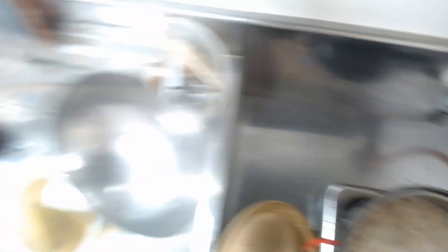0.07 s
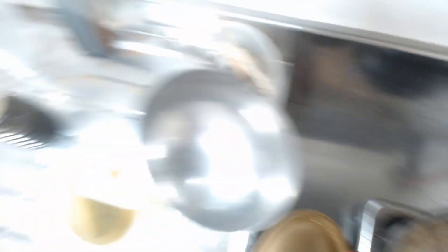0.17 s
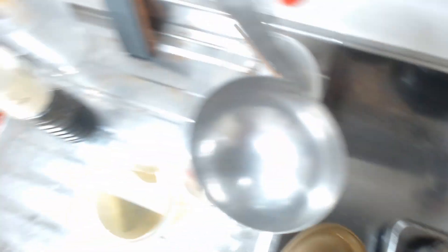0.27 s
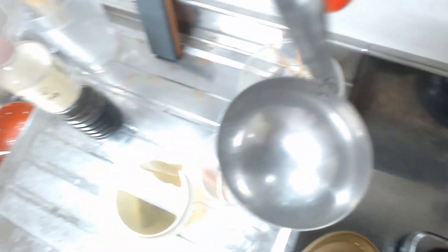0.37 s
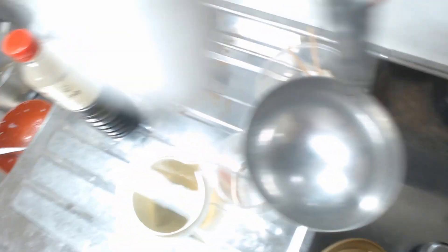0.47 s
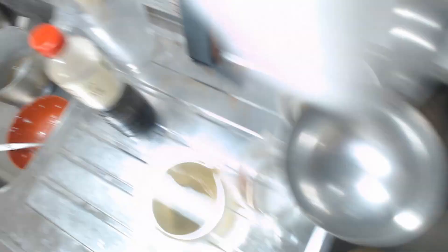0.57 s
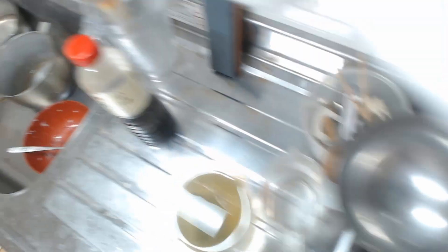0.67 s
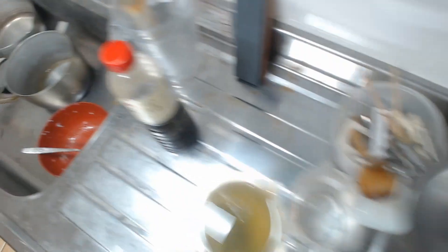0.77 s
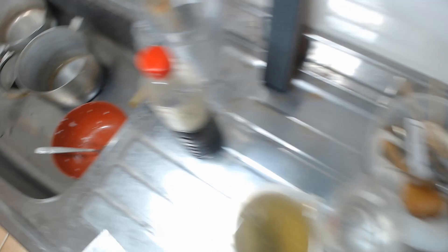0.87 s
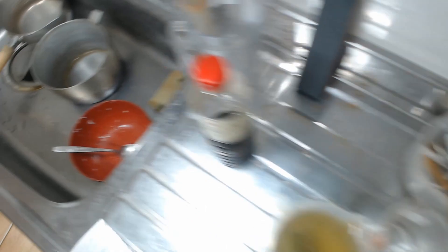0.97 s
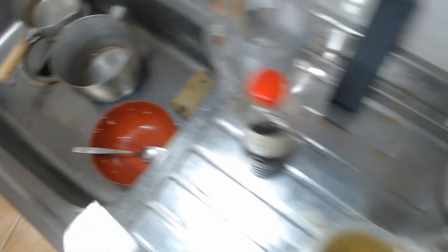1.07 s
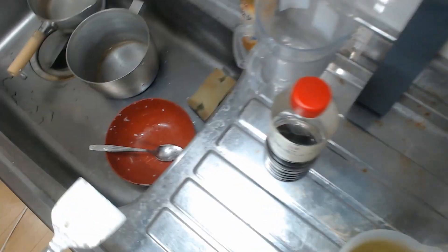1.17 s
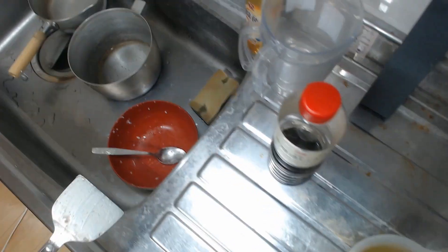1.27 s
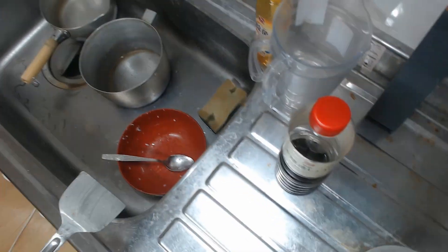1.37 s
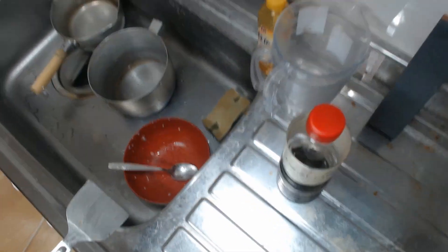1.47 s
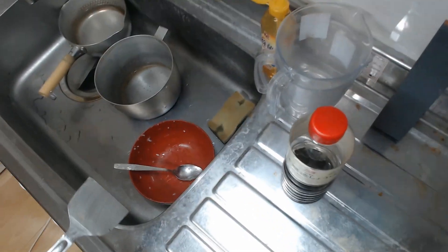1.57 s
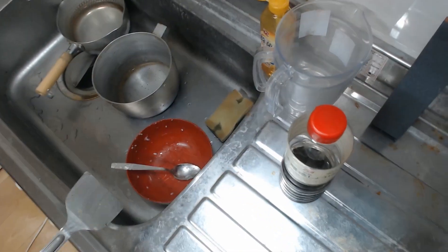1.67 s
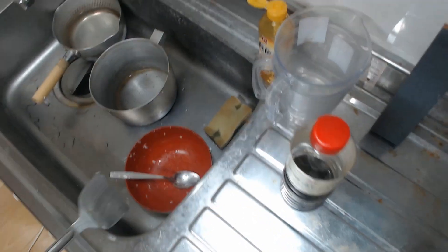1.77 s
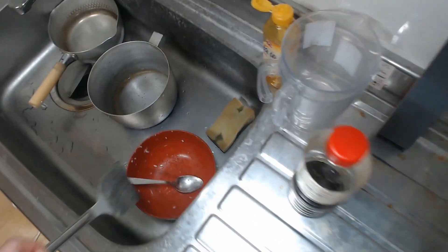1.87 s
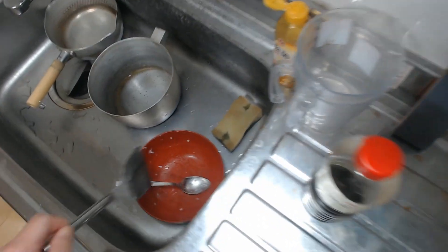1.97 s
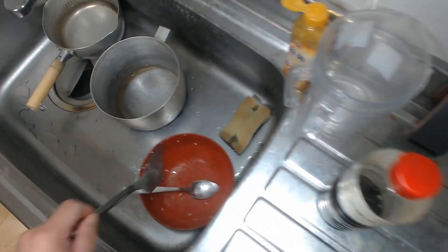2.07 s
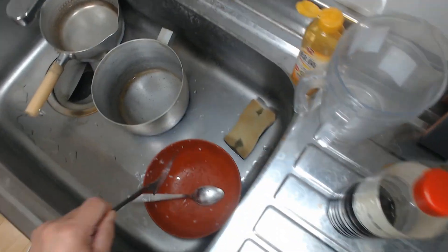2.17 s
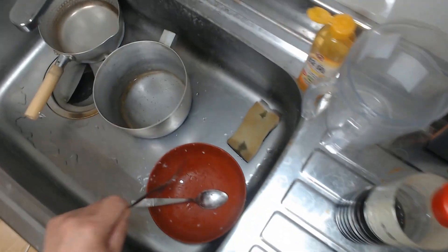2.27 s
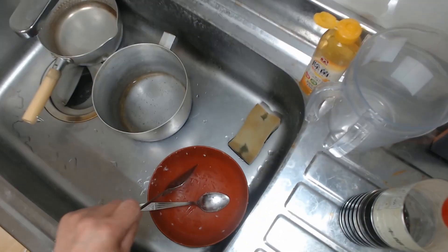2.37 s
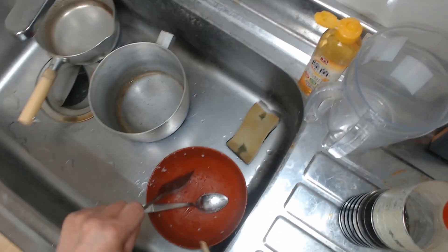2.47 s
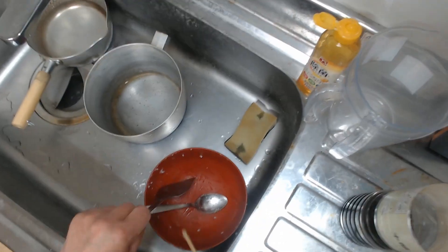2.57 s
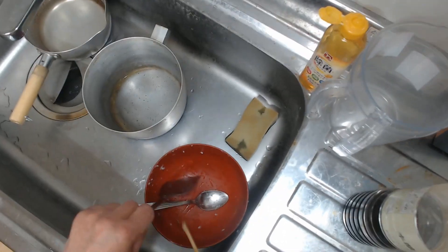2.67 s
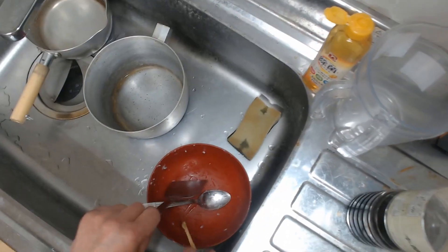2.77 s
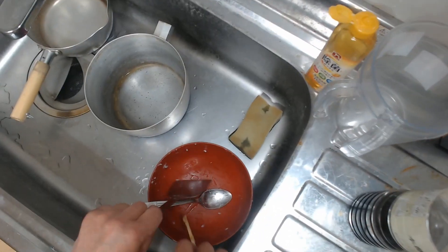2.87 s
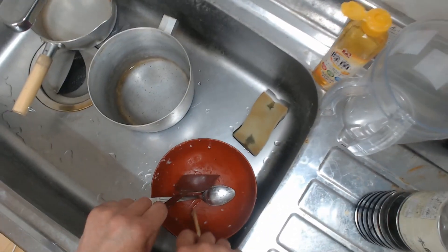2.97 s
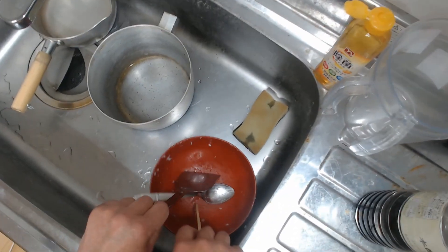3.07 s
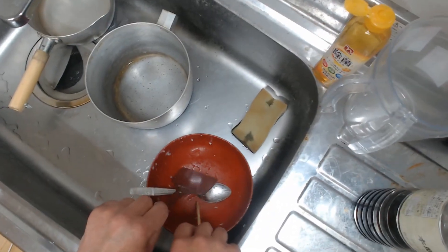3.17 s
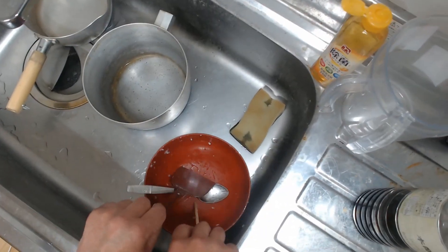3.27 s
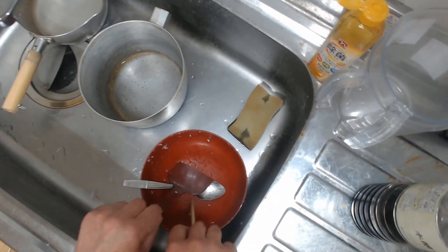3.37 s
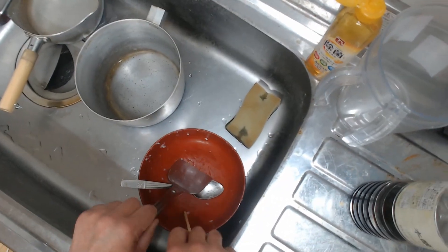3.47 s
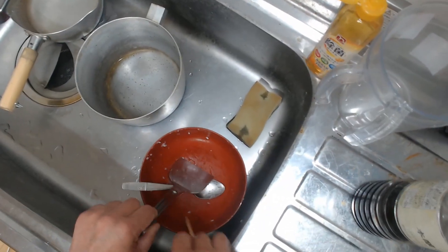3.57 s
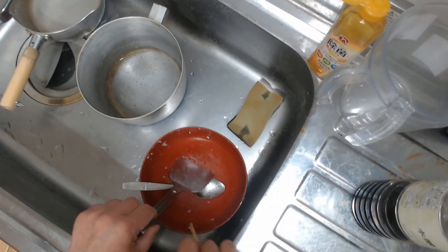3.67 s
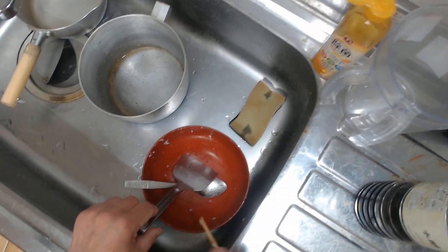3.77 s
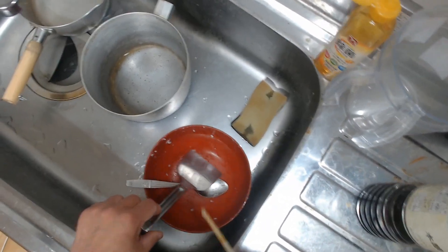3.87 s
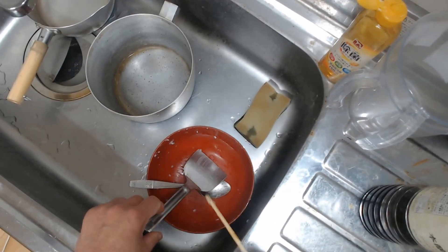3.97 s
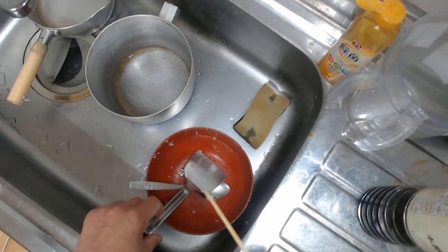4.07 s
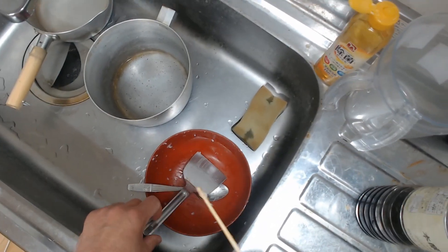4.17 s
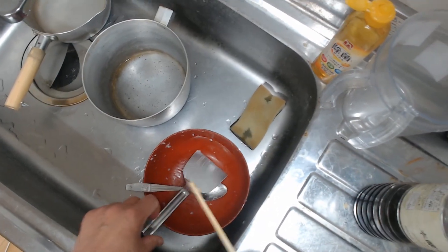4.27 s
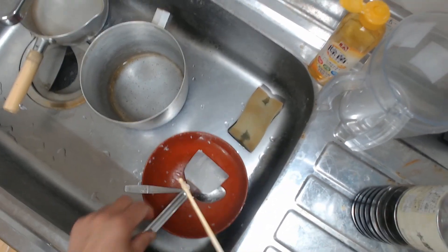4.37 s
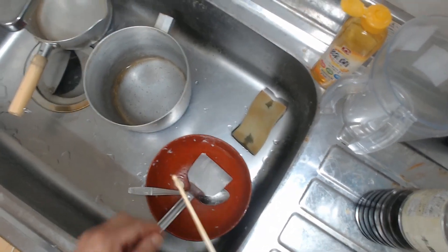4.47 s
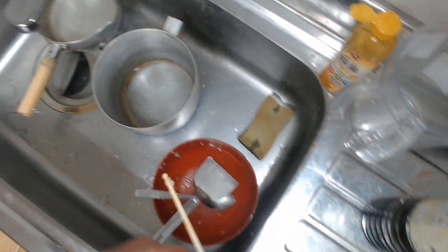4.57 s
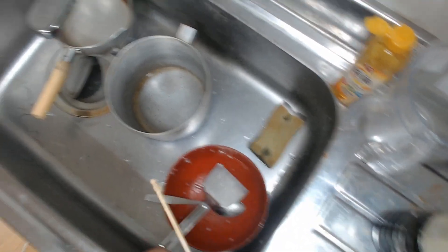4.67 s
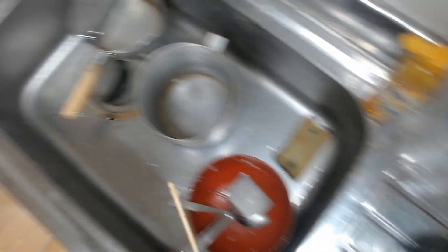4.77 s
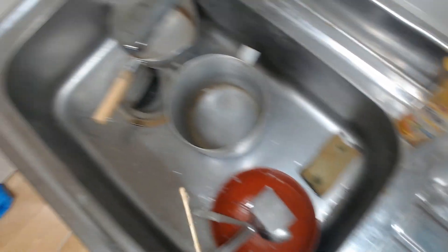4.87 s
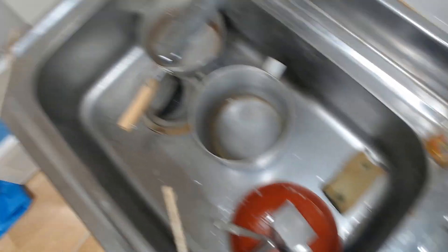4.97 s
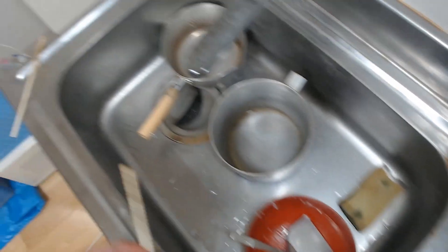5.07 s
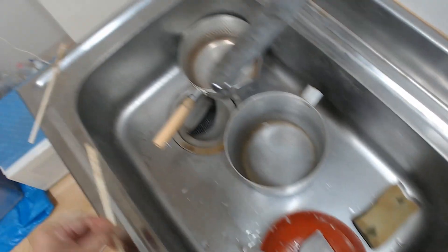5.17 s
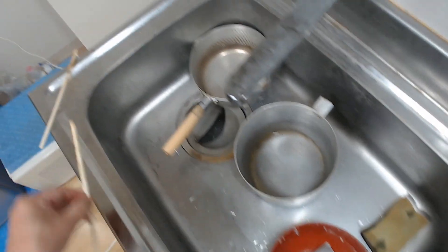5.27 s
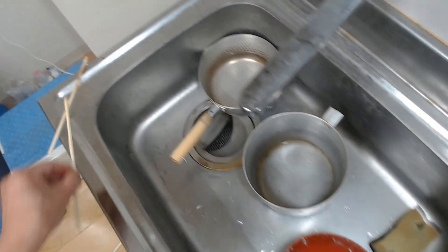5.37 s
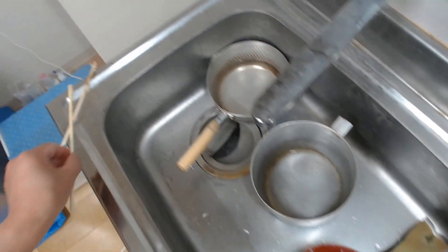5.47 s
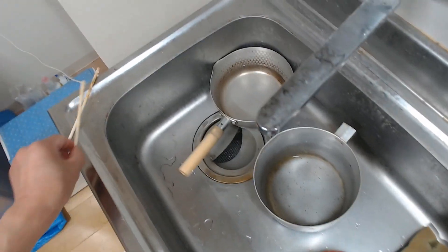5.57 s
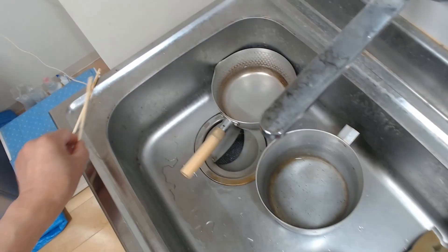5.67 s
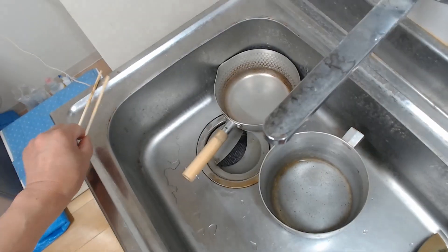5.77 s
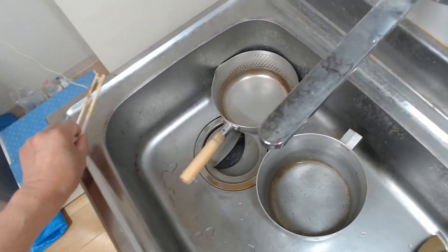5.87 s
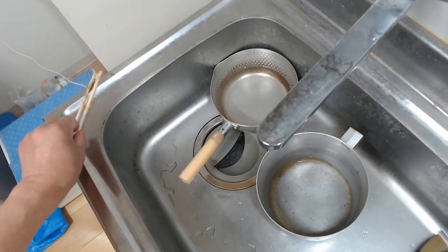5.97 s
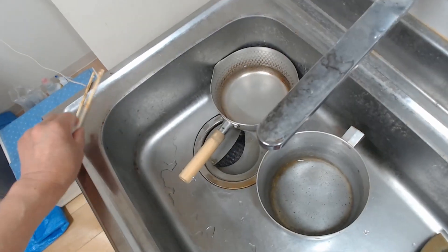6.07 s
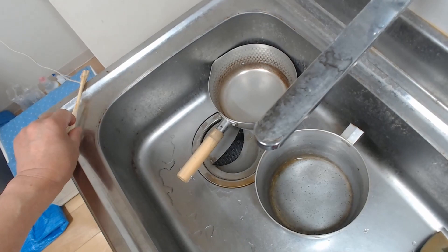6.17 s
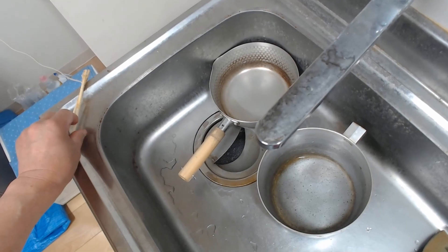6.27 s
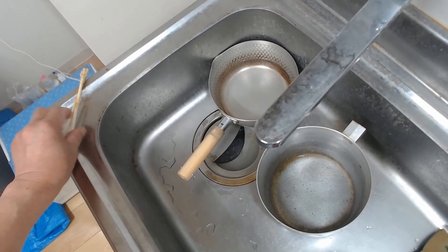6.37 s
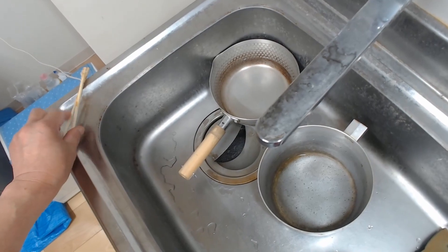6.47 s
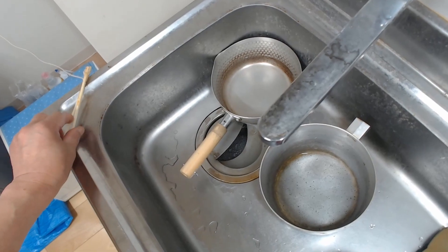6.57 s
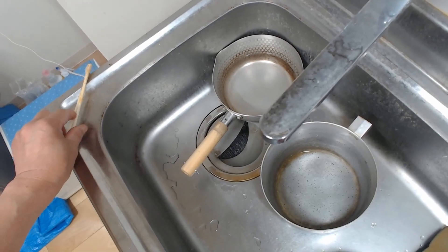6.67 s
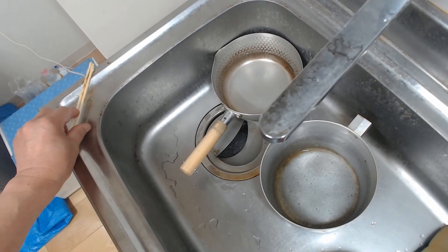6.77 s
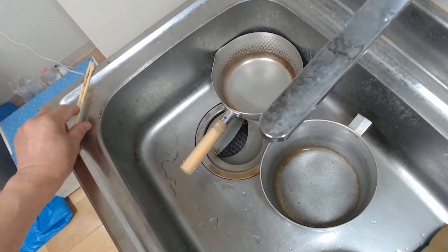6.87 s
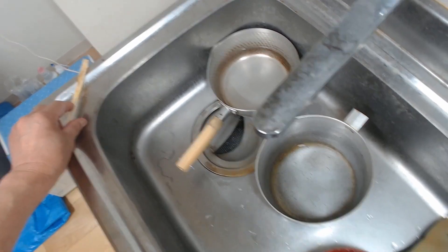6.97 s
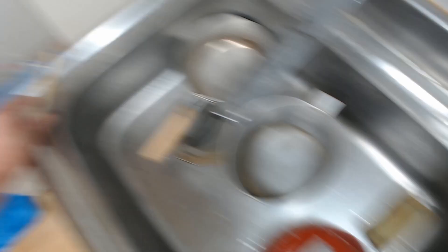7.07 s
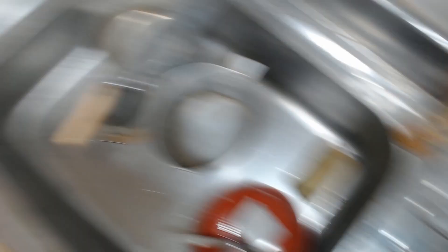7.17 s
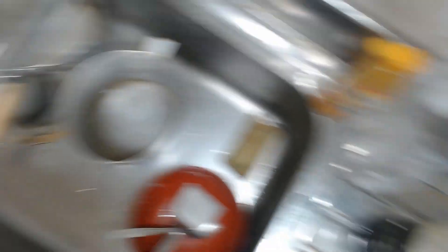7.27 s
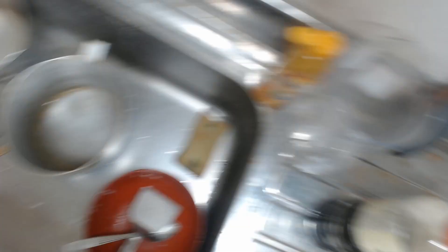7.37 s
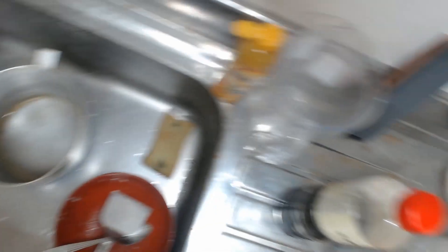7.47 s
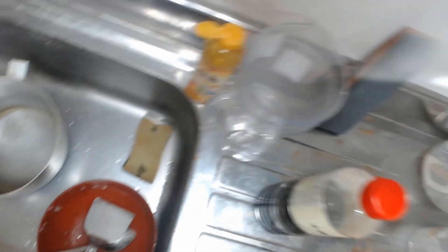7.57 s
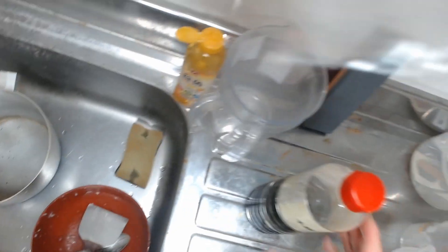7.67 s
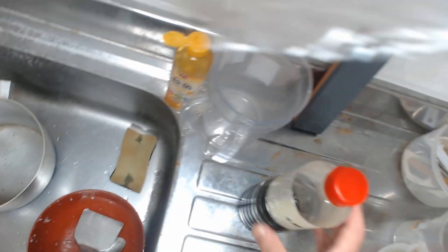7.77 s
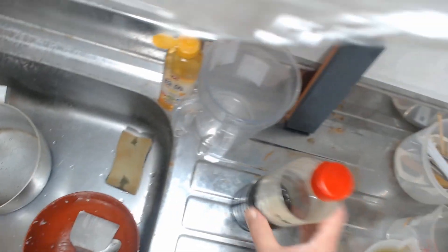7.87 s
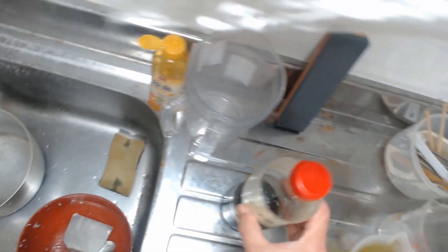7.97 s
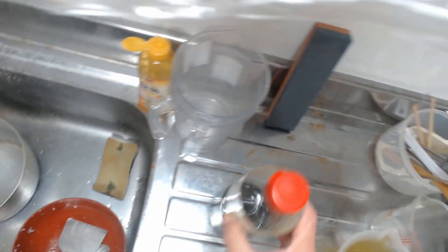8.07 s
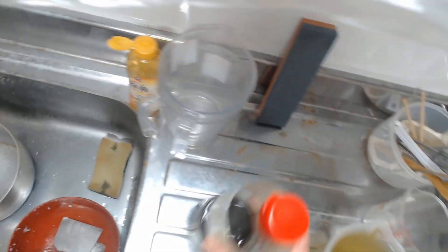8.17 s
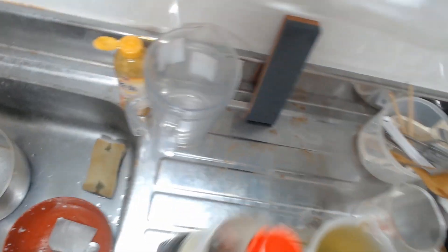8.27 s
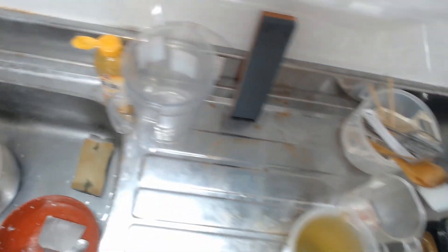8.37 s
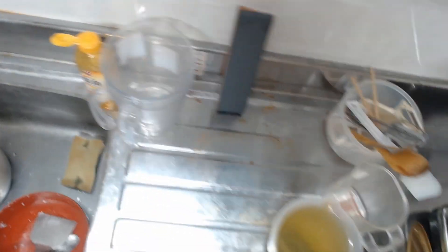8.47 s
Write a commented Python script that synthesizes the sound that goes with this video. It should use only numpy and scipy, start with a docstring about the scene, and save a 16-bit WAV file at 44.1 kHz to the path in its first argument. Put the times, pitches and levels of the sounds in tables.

```python
"""Clearing up at a steel sink

A spatula is knocked on a bowl and the sink's wall, scraped clean and dropped; chopsticks tap and slide on the rim.
A bottle groans over the drainboard, things clink there, and soft steps and rustles pass over air and a faint hum.
Shaped pushes and uneven friction excite bodies built from decaying modes and dense noise washes;
the squeal and the groan are unsteady sine tones."""
import sys
import numpy as np
from scipy import signal
from scipy.fft import rfft, irfft
from scipy.io import wavfile

SR = 44100
rng = np.random.default_rng(int(sys.argv[2]) if len(sys.argv) > 2 else 0)


def file_out(sig):
    """Save sig as 16-bit WAV at sys.argv[1]."""
    # one column per channel
    cols = np.atleast_2d(sig).T
    # limit, then scale
    lim = np.clip(cols, -1, 1)
    pcm = np.round(lim * 32767).astype(np.int16)
    wavfile.write(sys.argv[1], SR, pcm)


N = 376613
TIME = np.arange(N) / SR

# All levels are relative unless called rms.
# Room air: f/Hz, density/dB per Hz
AIR_COLOUR = [(15, -43), (25, -7.5), (64, 1), (86, -18), (189, -14), (235, -21), (261, -23), (382, -15),
              (461, -27.5), (572, -18), (620, -30.5), (710, -24.5), (3490, -40), (5820, -38),
              (15800, -61.5)]
# Appliance hum, before panning: f/Hz, rms level/dB
HUM_TONES = [(59.4, -67.5), (1120, -84.5), (4107, -92), (5798, -94), (6202, -93.5)]
AIR_RMS_DB = -59.5  # before panning
TOP_HZ = 15800
# Likeness of the two channels: f/Hz, correlation
LIKENESS = [(30, .9), (150, .995), (400, .99), (700, .75), (1400, .4), (2800, .62), (5000, 0), (12000, .2)]
# Ring time of sink and kitchen together, before each body's scale: f/Hz, t60/s
ROOM_RING = [(100, 0.22), (400, 0.44), (1000, 0.13), (3000, 0.28), (8000, .26), (15000, 0.38)]

# Soft contacts of feet, sleeve and hand: t/s, length/s, level/dB, thud/dB, clink/dB, tick/dB
BRUSHES = [(0.27, 0.087, -41.5, 6, -9, -6), (0.84, 0.19, -52, 5.5, -6.5, -2.5),
           (1.11, 0.2, -56, -14, 4, 11), (1.465, 0.077, -46, 3.5, -7, -3.5), (1.68, 0.1, -55, 9, 1.5, 0),
           (1.745, 0.03, -55, 26, 1, -22), (2.11, 0.088, -57.5, -1, -3, 3), (8.28, 0.24, -54.5, 15, 2, 6),
           (8.33, 0.053, -53.5, 24.5, -22, 1), (8.44, 0.092, -47, 16.5, -2, -1.5)]
# Weak resonances answering the brushes: f/Hz, density/dB per Hz
COUNTER_WASH = [(30, -11), (90, -11), (170, 4.5), (280, -1.5), (450, -1), (700, -3), (1100, -8),
                (1700, -11.5), (2800, -13), (3900, -15), (4800, -17), (7000, -23.5), (9000, -37.5),
                (15500, -39)]

# Light clinks on the drainboard: t/s, level/dB, thud/dB, treble/dB, left minus right from 1 kHz up/dB
CLINKS = [(0.221, -51.5, 14, -1, 10.5), (5.369, -74, 1, -5, -8), (5.79, -73, 0, -10, 4),
          (7.662, -69.5, 4, -9, -6), (7.685, -54.5, -9, -10, -3.5), (8.139, -72, 8, 1, -3)]
# Things shifting against each other: t/s, length/s, level/dB, thud/dB, clink/dB, tick/dB
JOSTLES = [(-0.01, 0.08, -51, 4, -1.5, 1), (0.11, 0.12, -55, 0, 0, -2), (0.21, 0.041, -44, 6, -8, -5)]
# Things on the drainboard, modes: f/Hz, level/dB, t60/s
DISH_MODES = [(910, 3, 0.3), (943, -2, 0.25), (1604, -5, 0.12), (1876, 3.5, 0.29), (2760, -7, 0.14),
              (3020, -11, 0.37), (3530, 6.5, 0.11), (4920, -22, 0.11), (6000, 1, 0.1), (7380, 4, 0.12)]
# Their weaker resonances: f/Hz, density/dB per Hz
DISH_WASH = [(300, -7), (600, 4), (1100, 1.5), (7000, -8.5), (9000, -22), (15500, -24)]
CLINK_TICK_DB = -5  # tick of a clink, relative to its treble

# Drainboard modes: f/Hz, level/dB, t60/s
BOARD_MODES = [(175.3, 8.5, 0.27), (341.8, 4, 0.39), (374, 2, 0.19), (613, -23, .2), (1105, -6, 0.21)]
# Weaker resonances of the drainboard: f/Hz, density/dB per Hz
BOARD_WASH = [(25, 6), (45, 9), (90, -6), (180, 10.5), (270, -13), (380, 2), (570, -6), (760, -14),
              (1150, -22.5), (1800, -29.5), (3000, -46), (6000, -48), (15500, -56)]
# One pull of the bottle: it breaks loose, slides ever more lightly and stops
DRAG_S, DRAG_LENGTH_S, DRAG_DB = 7.755, 0.24, -36
DRAG_ATTACK_S, DRAG_RELEASE_S, DRAG_SAG_DB_PER_S = 0.055, 0.047, 28.5
TYPICAL_SLIPS_PER_S = 60
GROAN_START_HZ, GROAN_HZ, GROAN_RISE_S = 390, 543, 0.062
GRATE_DB, GRATE_LENGTH_S, GRATE_RELEASE_S = -54.5, 0.059, .04  # grit under the base as it breaks loose

# Chopsticks tapping at the rim: t/s, level/dB, thud/dB, clink/dB, tick/dB
RIM_TAPS = [(3.083, -39.5, 5.5, -13, -2.5), (6.024, -36, -2, 7.5, 7.5), (6.032, -28, 2, 7, 4.5),
            (6.205, -39.5, 6.5, -20, -6), (6.224, -41.5, 11, -20, -4), (6.377, -48.5, 16, -2.5, 9),
            (6.398, -51, 6, -25, -2), (6.533, -59, -8, -2, -5), (6.620, -51, 8, -17, -7)]
# Chopsticks sliding along the rim: t/s, length/s, level/dB, thud/dB, clink/dB, tick/dB
RIM_SLIDES = [(5.98, 0.086, -50, 21, -24, -18), (6.20, 0.064, -39.5, 7, -36, -8),
              (6.37, 0.061, -48.5, 16.5, -10, 8), (6.58, 0.076, -42.5, 0, -16, -5),
              (6.73, 0.062, -55, -13, -9, -10)]
# Rim modes: f/Hz, level/dB, t60/s
RIM_MODES = [(193.7, -12, 0.47), (338, -3, 0.55), (380, 2.5, 0.32), (542.3, 3, 0.27), (726, 2.5, 0.2),
             (887, 1, 0.34), (943.4, 6, 0.17), (1093, 6.5, 0.12), (1480, -25, .2), (1808, -9, 0.26),
             (2440, -23.5, .17), (2772, -32, .2), (3400, -27, 0.52), (3520, -4, 0.15)]
# Weaker resonances of the rim: f/Hz, density/dB per Hz
RIM_WASH = [(50, -48), (130, -4), (230, -11.5), (400, 2.5), (650, 8), (1100, 4.5), (1500, -3.5),
            (2500, -12.5), (3800, -7.5), (4800, -20.5), (7000, -25.5), (9000, -33.5), (15500, -38)]

# Spatula knocking on the sink's wall: t/s, level/dB, thud/dB, clink/dB, tick/dB
WALL_KNOCKS = [(2.373, -29, -3, -2.5, -2), (2.380, -30.5, 6.5, 1.5, 9), (2.392, -28.5, -5.5, -0.5, -1.5),
               (2.426, -34, 6.5, -14, -16)]
# Wall modes: f/Hz, level/dB, t60/s
WALL_MODES = [(110.3, -14, 0.5), (182.6, 3.5, 0.26), (209, -2, 0.65), (389.6, 2.5, 0.41), (567, -6.5, 0.35),
              (727, -15, 0.49), (757, -6, 0.19), (947, -1.5, 0.25), (1104, -3.5, 0.17), (1300, -16, 0.35),
              (1616, -13, 0.29), (1831, -10, 0.19), (2019, -6, 0.16), (2206, -11, 0.22),
              (2405, -24.5, 0.45), (2770, -12, 0.42), (3800, -9, 0.17), (4040, -4, 0.073)]
# Weaker resonances of the wall: f/Hz, density/dB per Hz
WALL_WASH = [(30, -14), (85, -25), (170, 8.5), (270, -3.5), (400, 4.5), (750, 0), (1200, -3), (1700, -7),
             (2800, -4.5), (3900, -14), (4800, -22.5), (7000, -28.5), (9000, -34), (15500, -40.5)]

# Strokes across the bowl: t/s, length/s, scrape level/dB, basin shudder level/dB, favoured f/Hz
STROKES = [(2.881, .18, -51, -51, 2330), (3.102, 0.045, -55, -33.5, 2700), (3.206, 0.059, -56, -42.5, 4200),
           (3.275, 0.051, -53, -41, 3700), (3.324, 0.031, -52, -42, 3700), (3.38, 0.084, -53, -54, 3740),
           (3.543, 0.094, -49.5, -47.5, 3530), (3.64, 0.048, -43.5, -44, 2980),
           (3.691, 0.051, -44.5, -39, 3640)]
# Spatula gripped and pressed on the bowl, modes: f/Hz, level/dB, t60/s
PRESSED_MODES = [(562, 6, 0.22), (1085, 6, 0.17), (2440, 5.5, 0.13), (2610, -10, .1), (2790, 3.5, 0.32),
                 (3300, -2, 0.13), (3476, -20, 0.12), (3680, 0.5, 0.074), (3930, -1, 0.19)]
# Dense resonances under the scrape: f/Hz, density/dB per Hz
SCRAPE_WASH = [(200, -8.5), (400, -6), (750, 10), (1100, -3), (1600, 0), (2100, 2), (2400, 5), (3800, -2.5),
               (4500, -1.5), (5600, -4), (8000, -14), (15500, -26)]
STROKE_ATTACK_S, STROKE_RELEASE_S, STROKE_SAG_DB_PER_S = 0.0097, 0.021, 10
FOCUS_DB, FOCUS_OCTAVES = 8.5, 0.34  # lift and width of the resonances that a stroke favours
# The blade's edge squeals once, falling in pitch as it slows
SQUEAL_S, SQUEAL_LENGTH_S = 3.31, .18
SQUEAL_HZ, SQUEAL_SAG_HZ_PER_S = 5810, 1600
SQUEAL_DB, SQUEAL_FADE_DB_PER_S = -62, 79

# Light knocks of utensils on the bowl: t/s, level/dB, thud/dB, clink/dB, tick/dB
BOWL_KNOCKS = [(1.492, -54.5, 3.5, -2.5, -4), (2.622, -53, 11, -10, -17), (2.803, -46, 4, -13, -13),
               (2.879, -53.5, 7, -1, -16), (3.132, -41.5, 1.5, -3, -7), (3.203, -47, 6, 7, 12),
               (3.653, -55.5, 2, 18.5, 13.5), (3.846, -45.5, 3.5, -4.5, -8)]
# Dropped spatula lands on its blade, then its handle, and rattles: t/s, level/dB, thud/dB, clink/dB
DROP_BOUNCES = [(4.178, -20, -4, 1), (4.186, -16.5, -9.5, 5), (4.190, -21.5, 1, -1.5), (4.1958, -22, 8, -2),
                (4.2127, -19.5, 2.5, 0), (4.224, -25.5, 1, -0.5), (4.234, -26, 1.5, 5.5)]
DROP_TICK_DB, DROP_PAN_DB = 0, -0.7
# Tiny bright ticks: t/s, level/dB
TICKS = [(5.279, -75.5), (8.383, -70)]
# Colour of those ticks: thud/dB, boom/dB, clink/dB, tick/dB
TICK_COLOUR = (-3, -17, -15, 21.5)
# Steel basin with the bowl standing in it, modes: f/Hz, level/dB, t60/s
BASIN_MODES = [(146.3, -2, 0.53), (173.4, -6.5, .3), (211.3, -8, .4), (335, -7.5, 0.36), (385.4, 2.5, .47),
               (588, -3, .3), (702, -12, 0.3), (774, -7.5, 0.22), (818, -12.5, .21), (898.2, -13, 0.26),
               (958, -4.5, 0.24), (1070, -12.5, .24), (1120, -6, .22), (1506, -8.5, .22),
               (1807, -11.5, .18), (1900, -14, 0.23)]
# Steel spatula modes: f/Hz, level/dB
SPATULA_MODES = [(2266, -10), (2373, -7.5), (2402, -1.5), (2566, -4), (2745, -7.5), (2782, -1.5),
                 (3149, -19), (3345, -7.5), (3528, -1), (3690, -9.5), (3860, -14.5), (4060, -15.5),
                 (4761, -15.5), (6060, -22.5)]
SPATULA_T60_S = .2
# Weaker resonances and wall echoes of the sink: f/Hz, density/dB per Hz
SINK_WASH = [(30, -13), (85, -13.5), (140, -0.5), (270, -16), (385, 7), (490, -6.5), (700, -2.5),
             (1150, -6), (1700, -9), (2100, -7.5), (2800, -4.5), (3900, -12.5), (4800, -15), (7000, -21),
             (9000, -31.5), (11000, -30.5), (15500, -39.5)]

BOOM_PER_THUD = 0.49  # a heavier contact booms more: dB of boom per dB of thud
# How each place answers a contact: (boom/dB, left minus right from 1 kHz up/dB)
BOWL_PLACE, WALL_PLACE, RIM_PLACE = (-0.14, -1.8), (-2.5, -2), (-7.5, -4.5)
SLIDE_PLACE, DISH_PLACE, COUNTER_PLACE = (-3, -1.6), (2.5, 8.2), (-5.5, -3.3)


def undb(db):
    """Decibels to gain."""
    return 10 ** (np.asarray(db) / 20)


def at(points, hz):
    """Read (Hz, value) points on a logarithmic frequency axis."""
    f, value = np.transpose(points)
    return np.interp(np.log(np.maximum(hz, 1)), np.log(f), value)


def unit(x):
    """Scale a stereo response to unit energy, averaged over its channels."""
    return x / np.sqrt(np.sum(x ** 2) / 2)


def sides(db, hz=np.inf):
    """Left and right gains for a level difference; given frequencies, it vanishes in the bass."""
    return undb(np.array([[db], [-db]]) / 2 * np.minimum(hz / 1000, 1) ** 2)


def add(track, s, sound):
    """Mix a sound into a track at a time."""
    start = max(int(s * SR), 0)
    part = sound[:, :N - start]
    track[:, start:start + part.shape[1]] += part


def waver(rate):
    """A random wander drawn as straight lines between `rate` fresh values a second."""
    return np.interp(TIME * rate, np.arange(N // 20), rng.standard_normal(N // 20))


def stereo_noise(colour, size):
    """Spectrum of coloured noise whose channels are as alike as the likeness table says."""
    hz = np.arange(size // 2 + 1) * SR / size
    alike = np.clip(at(LIKENESS, hz), -.995, .995)
    mid, side = rfft(rng.standard_normal((2, size)))
    left_right = np.sqrt(1 + alike) * mid + np.sqrt(1 - alike) * side * np.array([[1], [-1]])
    return hz, undb(at(colour, hz)) * left_right


def wash(colour, swell_s, early_db, ring_scale, size=32768):
    """Dense ringing that builds up, is loud while the near walls answer, and dies band by band."""
    t = np.arange(size) / SR
    hz, spectrum = stereo_noise(colour, size)
    octave = np.log2(np.clip(hz, 64, 16384))
    out = 0
    for k in range(6, 15):  # overlapping octave bands centred on 2**k Hz
        band = irfft(spectrum * np.maximum(1 - abs(octave - k), 0), size)
        t60 = ring_scale * at(ROOM_RING, 2 ** k)
        out = out + band * np.exp(-np.log(1000) * t / t60)
    near_walls = 1 + undb(early_db) * np.exp(-(t / 0.019) ** 2)
    return unit(out * near_walls * (1 - np.exp(-t / swell_s)))


def ring(modes, swell_s, size=32768):
    """Decaying modes; the less alike the channels at a mode, the further apart their phases."""
    t = np.arange(size) / SR
    out = 0
    for hz, db, t60 in modes:
        spread = np.arccos(np.clip(at(LIKENESS, hz), -1, 1))
        lag = spread * rng.choice([-1, 1]) * np.array([[.5], [-.5]])
        tone = np.sin(2 * np.pi * (hz * t + rng.random()) + lag)
        out = out + undb(db) * tone * np.exp(-np.log(1000) * t / t60)
    return unit(out * (1 - np.exp(-t / swell_s)))


def excite(force, response):
    """Play a force through a ringing body."""
    return signal.fftconvolve(np.atleast_2d(force), response, axes=1)[:, :N]


def contact(thud_db, boom_db, clink_db, tick_db, pan_db, size=2048):
    """The short causal push of one contact with the given colour and direction."""
    colour = [(200, thud_db), (330, boom_db), (440, boom_db), (650, 0),
              (1250, 0.004), (2400, clink_db), (3700, clink_db), (5500, tick_db)]
    hz = np.arange(size // 2 + 1) * SR / size
    # folding the cepstrum packs the energy at the start: minimum phase
    cepstrum = irfft(np.log(undb(at(colour, hz)) * sides(pan_db, hz)))
    cepstrum[:, 1:size // 2] *= 2
    cepstrum[:, size // 2 + 1:] = 0
    return irfft(np.exp(rfft(cepstrum)))


def touch(place, thud_db, clink_db, tick_db):
    """A contact at a given place; its boom follows its thud."""
    boom_db, pan_db = place
    return contact(thud_db, boom_db + BOOM_PER_THUD * thud_db, clink_db, tick_db, pan_db)


def blows(contacts, push=46):
    """The force of a series of hard contacts, each (t/s, level/dB, shape of the push)."""
    force = np.zeros((2, N))
    for s, db, shape in contacts:
        add(force, s, push * undb(db) * shape)
    return force


def knocks(table, place):
    """The force of a table of knocks at one place."""
    return blows([(s, db, touch(place, *colour)) for s, db, *colour in table])


def grit(rate, spread_db, size):
    """Tiny catches of uneven size at random moments, about `rate` a second, rms 1."""
    chance, strength = rng.random(size), rng.standard_normal(size)
    catches = (chance < rate / SR) * np.sign(strength) * undb(spread_db * abs(strength))
    return catches / np.sqrt(np.mean(catches ** 2) + 1e-12)


def rubs(table, place):
    """Soft contacts: a swell of fine, uneven friction that comes and goes."""
    force = np.zeros((2, N))
    friction = grit(rate=1400, spread_db=3, size=N)
    for s, length, db, *colour in table:
        swell = np.hanning(int(length * SR))
        rub = swell * np.roll(friction, -int(s * SR))[:len(swell)]
        add(force, s, 1.115 * undb(db) * excite(rub, touch(place, *colour)))
    return force


def gesture(s, length, attack, release, sag_db):
    """Pressure of one movement: it rises, sags by sag_db a second while held, and dies away."""
    t = np.maximum(TIME - s, 0)
    rise = np.minimum(t / attack, 1)
    sag = undb(-sag_db * np.minimum(t, length))
    return rise * sag * np.exp(-np.maximum(t - length, 0) / release)


def friction_tone(hz, db, jitter, flutter_db, rate):
    """A sticking and slipping edge sings a note unsteady in pitch and level."""
    phase = np.cumsum(hz * (1 + jitter * waver(rate))) / SR
    return np.sqrt(2) * undb(db + flutter_db * waver(rate)) * np.sin(2 * np.pi * phase)


def room_tone():
    """Still kitchen air as coloured noise, and the hum of an appliance as steady sines."""
    air = irfft(stereo_noise(AIR_COLOUR, size=2 * N)[1])[:, :N]
    hum = 0
    for hz, db in HUM_TONES:
        hum = hum + np.sqrt(2) * undb(db) * np.sin(2 * np.pi * (hz * TIME + rng.random()))
    return (undb(AIR_RMS_DB) * air / air.std() + hum) * sides(1.8)


def soft_movements():
    """Feet, sleeve and hand rub softly and stir a dense, modeless ringing."""
    counter = wash(COUNTER_WASH, swell_s=.002, early_db=6, ring_scale=.9)
    return excite(rubs(BRUSHES, COUNTER_PLACE), counter)


def drainboard_things():
    """Things on the drainboard ring as they clink and shift against each other."""
    dense = wash(DISH_WASH, swell_s=0.0016, early_db=-4, ring_scale=1.0)
    dishes = unit(dense + undb(-3.5) * ring(DISH_MODES, swell_s=0.00033))
    clinks = blows([(s, db, contact(thud, -18, treble, treble + CLINK_TICK_DB, pan))
                    for s, db, thud, treble, pan in CLINKS])
    return excite(clinks + rubs(JOSTLES, DISH_PLACE), dishes)


def bottle():
    """The bottle's base sticks and slips unevenly on the ribbed drainboard, groaning and grating."""
    pull = gesture(DRAG_S, DRAG_LENGTH_S, DRAG_ATTACK_S, DRAG_RELEASE_S, DRAG_SAG_DB_PER_S)
    slip_rate = TYPICAL_SLIPS_PER_S * np.exp(0.49 * waver(rate=110))
    # one impulse each time the running count of slips passes a whole number
    slips = np.diff(np.floor(np.cumsum(slip_rate) / SR), prepend=0)
    force = slips * np.sqrt(SR / TYPICAL_SLIPS_PER_S) * undb(DRAG_DB) * pull
    dense = wash(BOARD_WASH, swell_s=0.0033, early_db=13, ring_scale=0.87)
    board = unit(dense + undb(-6.5) * ring(BOARD_MODES, swell_s=0.0017))

    rise = np.exp(-np.maximum(TIME - DRAG_S, 0) / GROAN_RISE_S)
    groan_hz = GROAN_HZ + (GROAN_START_HZ - GROAN_HZ) * rise
    groan = pull * friction_tone(groan_hz, DRAG_DB - 8, jitter=0.088, flutter_db=1.5, rate=120)

    steel_colour = [(500, -3), (1200, 4), (2000, 2.5), (3500, 0), (6500, -4.5), (9000, -18), (15500, -26)]
    steel = wash(steel_colour, swell_s=0.00085, early_db=-5, ring_scale=0.64)
    breakaway = gesture(DRAG_S, GRATE_LENGTH_S, 0.0023, GRATE_RELEASE_S, DRAG_SAG_DB_PER_S)
    grating = excite(grit(rate=97, spread_db=1.5, size=N) * undb(GRATE_DB) * breakaway, steel)
    return excite(force, board) + groan + grating


def chopsticks_on_rim():
    """Chopsticks tap and slide on the rim, which rings in its modes and a dense wash."""
    dense = wash(RIM_WASH, swell_s=0.00058, early_db=-18, ring_scale=1.0)
    rim = unit(dense + undb(2.0) * ring(RIM_MODES, swell_s=0.0041))
    return excite(knocks(RIM_TAPS, RIM_PLACE) + rubs(RIM_SLIDES, SLIDE_PLACE), rim)


def spatula_on_wall():
    """The spatula knocks the sink's steel wall and sets its modes ringing."""
    dense = wash(WALL_WASH, swell_s=0.00051, early_db=-11, ring_scale=1.0)
    wall = unit(dense + undb(6) * ring(WALL_MODES, swell_s=0.0024))
    return excite(knocks(WALL_KNOCKS, WALL_PLACE), wall)


def squeal():
    """The blade sings a thin falling note that the near walls throw back."""
    hz = SQUEAL_HZ - SQUEAL_SAG_HZ_PER_S * np.clip(TIME - SQUEAL_S, 0, SQUEAL_LENGTH_S)
    pressure = gesture(SQUEAL_S, SQUEAL_LENGTH_S, STROKE_ATTACK_S, STROKE_RELEASE_S, SQUEAL_FADE_DB_PER_S)
    note = pressure * friction_tone(hz, SQUEAL_DB, jitter=0.0154, flutter_db=-3, rate=200)
    return excite(note, wash([(100, 0), (15000, 0)], swell_s=0.00088, early_db=15, ring_scale=.8))


def scraping():
    """The spatula's edge catches on the bowl and rings; the bowl rocks and shudders the basin."""
    pressure = np.array([gesture(s, length, STROKE_ATTACK_S, STROKE_RELEASE_S, STROKE_SAG_DB_PER_S)
                         for s, length, *_ in STROKES])
    _, _, edge_db, shudder_db, focus_hz = np.transpose(STROKES)
    catches = grit(rate=310, spread_db=5.5, size=N) * undb(-7.5 + 2.2 * waver(rate=40))
    dense = wash(SCRAPE_WASH, swell_s=0.0024, early_db=-11, ring_scale=1.0)
    edge = excite(catches * (undb(edge_db) @ pressure), dense)
    for mode in PRESSED_MODES:
        hz, db, _ = mode
        # the point of contact travels over the nodes, so each mode swells and fades on its own
        coupling = undb(5 * waver(rate=12))
        favour_db = FOCUS_DB * np.exp(-(np.log2(hz / focus_hz) / FOCUS_OCTAVES) ** 2)
        force = catches * coupling * (undb(edge_db + favour_db) @ pressure)
        edge = edge + undb(db - 13) * excite(force, ring([mode], swell_s=0.0012))

    basin_colour = [(60, -33), (110, -2.5), (145, 1.0), (190, -0.5), (260, -28.0), (500, -55)]
    basin = wash(basin_colour, swell_s=.004, early_db=0, ring_scale=0.6)
    rocking = grit(rate=180, spread_db=-6.5, size=N) * (undb(shudder_db - 4.5) @ pressure)
    return (edge + squeal()) * sides(-2.5) + excite(rocking, basin)


def bowl_contacts():
    """Knocks, ticks and the dropped spatula's clatter ring the bowl, basin and spatula together."""
    drop_place = (BOWL_PLACE[0], DROP_PAN_DB)
    drop = knocks([(*bounce, DROP_TICK_DB) for bounce in DROP_BOUNCES], drop_place)
    ticks = blows([(s, db, contact(*TICK_COLOUR, pan_db=2.0)) for s, db in TICKS])
    dense = wash(SINK_WASH, swell_s=0.00094, early_db=3.5, ring_scale=0.95)
    basin = ring(BASIN_MODES, swell_s=.005)
    spatula = ring([(hz, db, SPATULA_T60_S) for hz, db in SPATULA_MODES], swell_s=.0013)
    bowl = unit(dense + undb(4) * basin + undb(-4) * spatula)
    return excite(knocks(BOWL_KNOCKS, BOWL_PLACE) + drop + ticks, bowl)


def scene():
    """Layer the kitchen from its background to the work at the bowl."""
    background = room_tone() + soft_movements()
    drainboard = drainboard_things() + bottle()
    sink = chopsticks_on_rim() + spatula_on_wall()
    return background + drainboard + sink + scraping() + bowl_contacts()


def record(dry):
    """A steep low-pass cuts the top."""
    return signal.sosfilt(signal.ellip(10, .2, 80, TOP_HZ, fs=SR, output="sos"), dry)


dry = scene()
out = record(dry)
file_out(out)
```